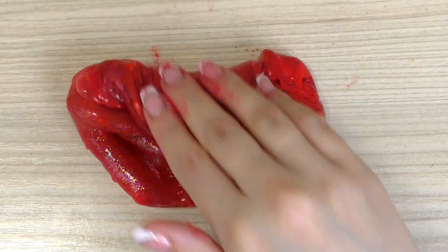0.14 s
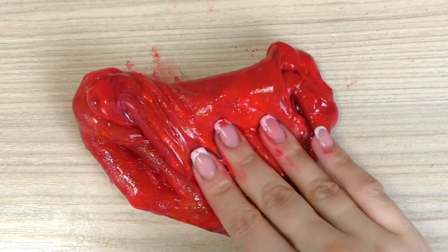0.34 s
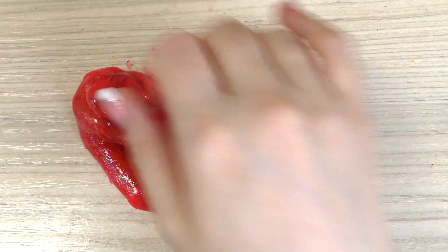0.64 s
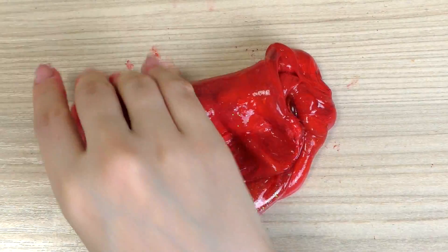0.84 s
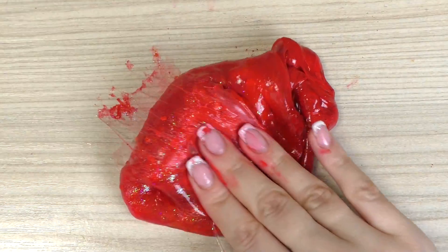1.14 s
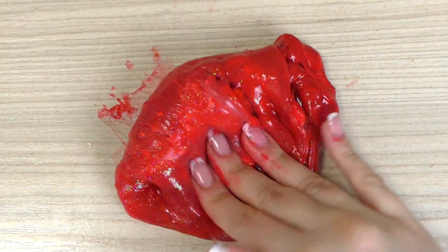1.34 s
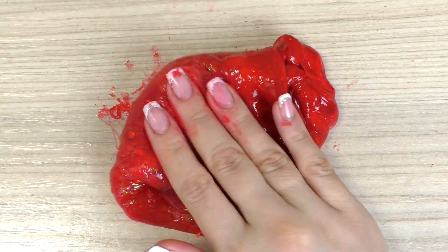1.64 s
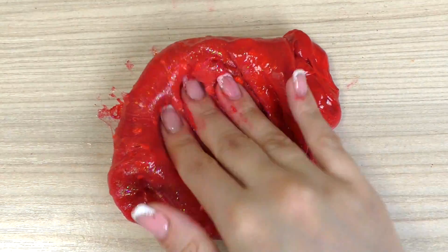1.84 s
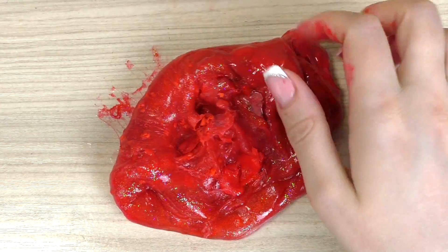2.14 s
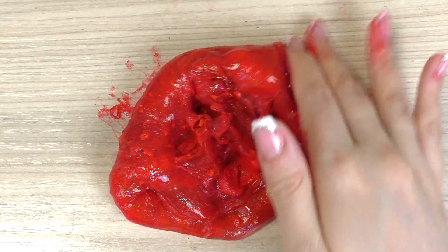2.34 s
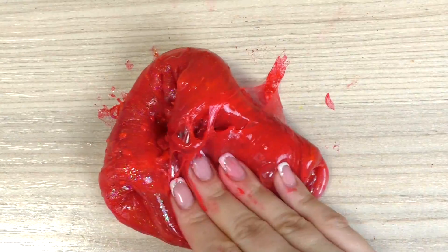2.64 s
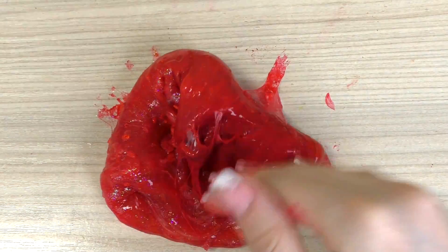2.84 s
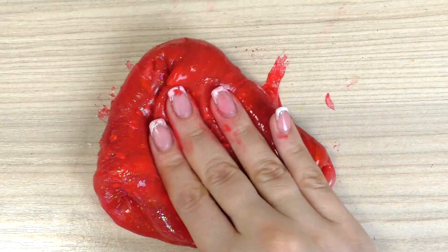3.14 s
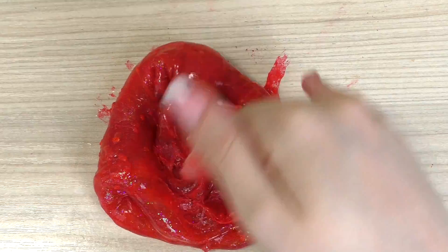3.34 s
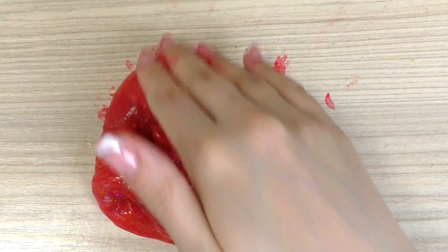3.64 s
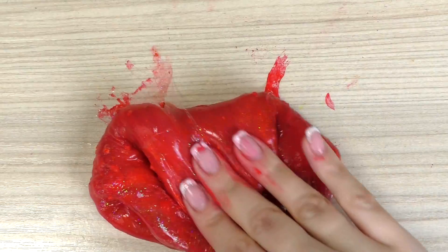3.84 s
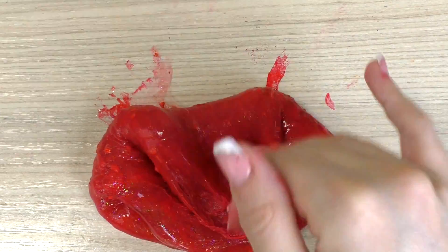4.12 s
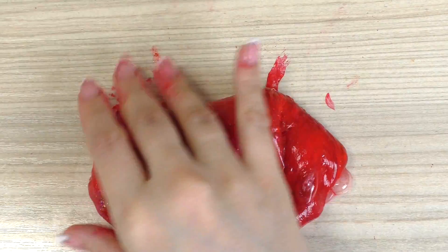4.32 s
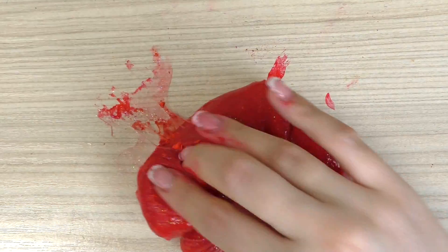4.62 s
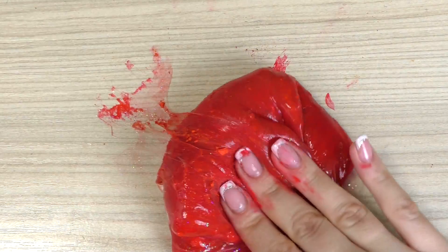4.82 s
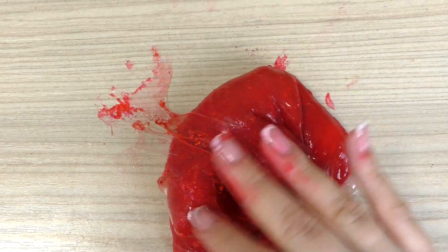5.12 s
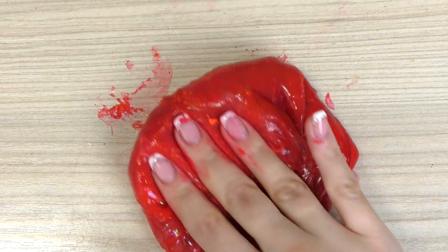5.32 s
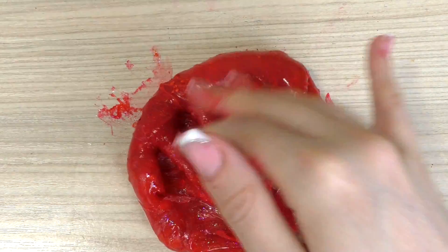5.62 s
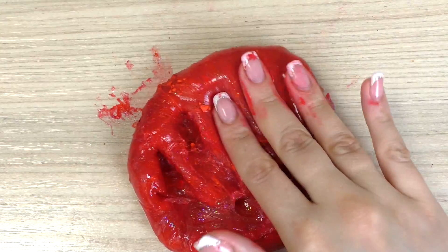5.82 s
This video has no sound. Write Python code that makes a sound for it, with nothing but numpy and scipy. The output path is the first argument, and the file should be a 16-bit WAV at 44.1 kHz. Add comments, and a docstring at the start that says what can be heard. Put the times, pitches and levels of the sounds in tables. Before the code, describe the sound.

Irregular wet clicks and little pops come from slime being kneaded by hand on a wooden tabletop. A round plop and a sharp snap stand out early, then smaller pops keep coming, singly and in quick clusters, with fine sticky crackling and a few dull, soft presses. The sound is close and centred, in a small room with faint hiss and a low hum.

```python
"""Kneading slime

A hand presses and folds sticky slime on a wooden table, close by in a small room. Trapped air pockets
burst with wet clicks and plops, the skin crackles as it peels off fingers and table, and presses thud
softly. A faint low hum and hiss lie underneath."""
import sys
import numpy as np
from scipy import signal
from scipy.io import wavfile
from scipy.ndimage import uniform_filter1d

SR = 44100
rng = np.random.default_rng(int(sys.argv[2]) if len(sys.argv) > 2 else 0)


def persist_wave(psi):
    """Save psi, clipped to +-1, as 16-bit WAV."""
    counts = np.round(np.clip(psi, -1, 1) * 32767).astype(np.int16)
    wavfile.write(sys.argv[1], SR, np.atleast_2d(counts).T)


N = 263277


# Large air pockets: t/s, cavity f/Hz, cavity level/dB, cavity rise/cycles, film f/Hz, film level/dB
POCKETS = [(0.1476, 4470, -25.5, 0.95, 7400, -26), (0.149, 6100, -26.5, 1.2, 9000, -20.5),
           (0.2596, 1570, -31.5, 0.29, 4100, -46), (0.3858, 1400, -28, 4.1, 11490, -50),
           (0.4396, 1480, -23.5, 1.3, 8900, -42), (0.4467, 1613, -9, 1.68, 2790, -19.5),
           (0.4559, 1560, -26, 1.2, 2970, -50), (0.9568, 4060, -38, 0.15, 12950, -27),
           (1.0082, 7500, -50, 0.54, 9400, -24.5), (1.0571, 6200, -40, 0.27, 8900, -23.5),
           (1.0605, 5700, -24.5, 0.45, 8030, -22.5), (1.1732, 3200, -22, 0.28, 8900, -22),
           (1.3, 3240, -28, 0.19, 6980, -42), (1.3253, 6000, -1, 0.42, 14700, -6),
           (1.6088, 3540, -55, 0.17, 12600, -38.5), (2.021, 6800, -31, 0.6, 11900, -31.5),
           (2.0598, 4060, -28, 1.5, 12300, -41), (2.0655, 3820, -25.5, 0.89, 12800, -33),
           (2.3531, 3560, -28, 0.12, 12100, -32.5), (2.356, 3080, -15.5, 0.23, 3800, -30.5),
           (2.446, 4650, -53, 0.25, 11000, -33.5), (2.6682, 9700, -29.5, 2.9, 2380, -45),
           (2.7462, 1630, -25.5, 0.31, 10400, -12.5), (2.887, 1500, -50, 0.18, 12200, -33),
           (3.155, 6420, -6.5, 0.55, 4570, -25.5), (3.3991, 2040, -24, 0.067, 11000, -12),
           (3.401, 1210, -43, 2.8, 11000, -39), (3.8056, 1600, -46, 0.4, 9600, -30.5),
           (4.1648, 1100, -48.5, 2.0, 10100, -25.5), (4.47, 2160, -30, 1, 3130, -29.5),
           (4.5931, 3500, -53, 0.2, 9400, -33), (4.918, 2700, -30.5, 0.25, 11300, -30),
           (5.1096, 4610, -20.5, 0.49, 9300, -23), (5.4592, 3980, -51, 0.39, 12300, -21),
           (5.4614, 2380, -50, 0.23, 12800, -29), (5.645, 2000, -57, 0.65, 13500, -22),
           (5.66, 4340, -34, 1.5, 10200, -18), (5.6633, 4440, -23, 1.33, 9100, -41),
           (5.863, 5000, -47, 0.21, 12700, -26.5)]

def pops(film_rise_cycles=0.7, slow_rise_s=0.0005):
    """A pocket bursts: the film snaps, the cavity rings. Slow cavities ring cleanly, without the rips."""
    out = np.zeros(N)
    for start_s, cavity_hz, cavity_db, rise_cycles, film_hz, film_db in POCKETS:
        rupture = tear(max(cavity_db, film_db))
        cavity = ping(cavity_hz, rise_cycles, roundness=1.4)
        if rise_cycles / cavity_hz <= slow_rise_s:
            cavity = np.convolve(cavity, rupture)
        film = np.convolve(ping(film_hz, film_rise_cycles), rupture)
        add(out, start_s, from_db(cavity_db) * cavity)
        add(out, start_s, from_db(film_db) * film)
    return out


def tear(pocket_db, raggedness=0.32, onset_s=0.0013, fade_s=0.0051):
    """One rupture, then small rips as the hole widens. Weaker pockets open more raggedly."""
    t = np.arange(SR // 50) / SR
    rips = rng.standard_normal(len(t)) * (1 - np.exp(-t / onset_s)) * np.exp(-t / fade_s)
    rip_gain = from_db(-13.5 - raggedness * pocket_db)
    impulse = t == 0
    return (impulse + rip_gain * rips / np.linalg.norm(rips)) / np.hypot(1, rip_gain)


# Sticky contacts peeling: peak t/s, length/s, level/dB, treble tilt/dB
PEELS = [(0.064, 0.078, -74, -9.5), (0.134, 0.049, -60, -3), (0.287, 0.14, -65, 3), (0.39, 0.08, -62, -6.5),
         (0.609, 0.07, -55, -2.5), (1.001, 0.069, -55.5, 3), (1.165, 0.12, -63, -5.5),
         (1.26, 0.08, -62.5, -5), (1.511, 0.083, -58, 1), (1.79, 0.16, -76, -14.5),
         (2.047, 0.098, -55.5, -0.5), (2.381, 0.066, -56.5, -5.5), (2.539, 0.12, -56.5, 0.5),
         (2.73, 0.39, -64.5, -2), (2.917, 0.055, -49, 1), (3.412, 0.065, -51, 1), (3.815, 0.153, -64, 3.5),
         (3.991, 0.13, -68.5, -7.5), (4.171, 0.055, -59, 1), (4.486, 0.061, -61.5, -10),
         (4.614, 0.098, -60, 3.5), (4.69, 0.14, -67, 6.5), (4.813, 0.05, -60.5, -3),
         (4.944, 0.22, -66.5, -5), (5.114, 0.055, -46.5, 1), (5.607, 0.055, -64.5, 0),
         (5.673, 0.07, -51, 2.5)]

def peeling(rise_share=0.48, mid_db=-2):
    """Each peel swells and fades. Returns the power of the low, mid and high bubbles over time."""
    t = np.arange(N) / SR
    power = np.zeros((3, N))
    for peak_s, length_s, level_db, tilt_db in PEELS:
        near = np.abs(t - peak_s) < 2 * length_s
        offset_s = t[near] - peak_s
        width_s = length_s * np.where(offset_s < 0, rise_share, 1 - rise_share)
        gains = from_db(level_db + np.array([-tilt_db, mid_db, tilt_db]))
        power[:, near] += gains[:, None] ** 2 * np.exp(-2 * (offset_s / width_s) ** 2)
    return power


# Tiny bubbles, low to high: min f/Hz, max f/Hz, rate/(1/s), rise/cycles, level between peels/dB
BUBBLES = [(1076, 3000, 800, 1.11, -76), (3225, 6780, 1300, 1.5, -90.5), (9200, 13500, 550, 1.3, -84)]

def squelches(tick_db=-62, tick_follow=0.87):
    """Peeling skin crackles over a steady trace. Stray ticks of pinhead pockets follow the top band."""
    out = np.zeros(N)
    for (low_hz, high_hz, rate_per_s, rise_cycles, rest_db), power in zip(BUBBLES, peeling()):
        envelope = np.sqrt(power + from_db(rest_db) ** 2)
        out += envelope * crackle(low_hz, high_hz, rate_per_s, rise_cycles)
    ticks = crackle(low_hz=7500, high_hz=15000, rate_per_s=70, rise_cycles=0.6)
    return out + from_db(tick_db) * unit_rms(envelope ** tick_follow) * ticks


def crackle(low_hz, high_hz, rate_per_s, rise_cycles, spread_db=3.5, pitches=7):
    """Tiny bubbles of uneven size and pitch burst at random; rms 1."""
    out = np.zeros(N)
    for hz in np.geomspace(low_hz, high_hz, pitches):
        sizes = from_db(spread_db * np.minimum(rng.exponential(1, N), 4))
        signs = rng.choice([-1, 1], N)
        bursts = rng.random(N) < rate_per_s / pitches / SR
        bubble = ping(hz, rise_cycles)
        out += signal.oaconvolve(sizes * signs * bursts, bubble / np.linalg.norm(bubble))[:N]
    return unit_rms(out)


# Presses and large pockets: t/s, f/Hz, level/dB, rise/cycles
THUDS = [(0.445, 407, -46.5, 1.1), (1.268, 366, -59, 1.5), (1.325, 394, -52.5, 0.7),
         (1.789, 306, -60.5, 1.6), (2.357, 107.8, -57, 0.85), (2.355, 347, -59, 0.94),
         (3.411, 438, -54, 1.2), (3.429, 115, -56.5, 0.54), (4.186, 109.3, -59.5, 0.61),
         (5.111, 380, -61.5, 1.6), (5.145, 100, -53.5, 0.75), (5.667, 400, -53, 3.6)]

def thuds(squish_db=-13, squish_rise_s=0.0092):
    """Soft low knocks, damped by the slime, each with a dull squish around its pitch."""
    out = np.zeros(N)
    age = np.arange(SR // 8) / SR / squish_rise_s
    for start_s, hz, level_db, rise_cycles in THUDS:
        squish = rng.standard_normal(len(age))
        for _ in range(2):
            squish = resonance(squish, hz, width_hz=1.4 * hz)
        add(out, start_s, from_db(level_db) * ping(hz, rise_cycles))
        add(out, start_s, from_db(level_db + squish_db) * unit_rms(squish) * age * np.exp(1 - age))
    return out


# Table top resonances: f/Hz, width/Hz, level/dB
WOOD_MODES = [(1136, 50, 7), (1590, 43, -9), (2380, 38, -6.5)]

def table_top(x, highpass_hz=1050, body_db=-17):
    """Small pockets radiate little bass; the wood rings along and adds a faint low body."""
    body = from_db(body_db) * resonance(x, hz=390, width_hz=500)
    direct = signal.sosfilt(signal.butter(4, highpass_hz, "high", fs=SR, output="sos"), x)
    ring = sum(from_db(db) * resonance(direct, hz, width_hz) for hz, width_hz, db in WOOD_MODES)
    return direct + body + ring


# Room response: f/Hz, early level/dB, tail level/dB, T60/s
REVERB = [(400, -13.5, -3, 0.23), (1500, -9, -10, 0.44), (3300, -0.5, -8, 0.42), (4670, -7.5, -6, 0.24),
          (7300, 0.5, -6, 0.32), (8760, -5.5, -7.5, 0.27), (11000, 0, -7.5, 0.22), (14600, -5, -7.5, 0.16)]
# Stereo image of the reflections: f/Hz, left-right correlation
REVERB_CORRELATION = [(300, 0.57), (1500, 0.35), (6500, 1), (15000, 0.64)]

def room(x, gap_s=0.00076, early_decay_s=0.0064, tail_rise_s=0.0078):
    """Quick reflections from hand and table, then a short diffuse tail."""
    t = np.arange(SR // 2) / SR
    age_s = np.maximum(t - gap_s, 0)
    early = np.exp(-age_s / early_decay_s) * (age_s > 0)
    response = 0
    for hz, band in noise_bands(REVERB_CORRELATION, samples=2 * len(t), count=27, lowest_hz=100):
        early_db, tail_db, t60_s = (at_hz(REVERB, hz, column) for column in (1, 2, 3))
        tail = (1 - np.exp(-age_s / tail_rise_s)) * from_db(-60 * age_s / t60_s)
        early_gain = from_db(early_db) / np.linalg.norm(early)
        tail_gain = from_db(tail_db) / np.linalg.norm(tail)
        response += band[:, len(t):] * np.hypot(early_gain * early, tail_gain * tail)
    return signal.fftconvolve(x[None], response, axes=1)[:, :N]


# Room noise spectrum: f/Hz, relative density/dB
AIR_SPECTRUM = [(25, -12), (50, -15), (110, -5), (180, -8.5), (370, -11.5), (580, -24), (1000, -17),
                (2000, -18.5), (3000, -23), (4500, -30), (6800, -48), (10000, -33), (16000, -28)]
# Stereo image of the room noise: f/Hz, left-right correlation
AIR_CORRELATION = [(30, 0.31), (130, 0.47), (300, 0.65), (640, 0.45), (1400, 0.31), (3200, 0.15),
                   (6500, .4), (15000, 0.37)]

def air(level_db=-63):
    """Steady room noise and hiss."""
    bands = noise_bands(AIR_CORRELATION, samples=N, count=20, lowest_hz=20)
    noise = sum(from_db(at_hz(AIR_SPECTRUM, hz)) * band for hz, band in bands)
    return from_db(level_db) * unit_rms(noise)


def hum(hz=155, wander_hz=5.54, level_db=-71.5, waver_db=7):
    """A faint low tone that wavers in level and slightly in pitch."""
    phase = 2 * np.pi * np.cumsum(hz + wander_hz * drift(window_samples=2500)) / SR
    gain = from_db(level_db + waver_db * drift(window_samples=4000))
    return gain * np.sqrt(2) * np.sin(phase)


def ping(hz, rise_cycles, roundness=0.77):
    """Heavily damped tone; its envelope peaks after rise_cycles. Roundness softens the start."""
    rise_s = rise_cycles / hz
    t = np.arange(int(10 * rise_s * SR) + 8) / SR
    age = t / rise_s
    return (age * np.exp(1 - age)) ** roundness * np.sin(2 * np.pi * hz * t)


def resonance(x, hz, width_hz):
    """Two-pole band-pass, peak gain 1."""
    radius = np.exp(-np.pi * width_hz / SR)
    feedforward = np.array([1, 0, -1]) * (1 - radius ** 2) / 2
    feedback = [1, -2 * radius * np.cos(2 * np.pi * hz / SR), radius ** 2]
    return signal.lfilter(feedforward, feedback, x)


def noise_bands(correlation, samples, count, lowest_hz):
    """Yield (centre f/Hz, band) of partly correlated stereo noise."""
    edges_hz = np.geomspace(lowest_hz, 17000, count + 1)
    white = rng.standard_normal((2, 2, samples))
    for k, (low_hz, high_hz) in enumerate(zip(edges_hz, edges_hz[1:])):
        bandpass = signal.butter(2, [low_hz, high_hz], "band", fs=SR, output="sos")
        mid, side = signal.sosfilt(bandpass, white[k % 2])
        hz = np.sqrt(low_hz * high_hz)
        alike = at_hz(correlation, hz)
        yield hz, np.sqrt((1 + alike) / 2) * mid + np.sqrt((1 - alike) / 2) * side * [[1], [-1]]


def drift(window_samples):
    """Slow random motion; rms 1."""
    return unit_rms(uniform_filter1d(rng.standard_normal(N), size=window_samples, mode="wrap"))


def at_hz(table, hz, column=1):
    """Interpolate a column over log frequency."""
    table = np.array(table)
    return np.interp(np.log(hz), np.log(table[:, 0]), table[:, column])


def add(track, start_s, sound):
    start = round(start_s * SR)
    track[start:start + len(sound)] += sound[:N - start]


def from_db(db):
    return 10 ** (np.asarray(db) / 20)


def unit_rms(x):
    return x / np.sqrt(np.mean(x ** 2) + 1e-20)


def scene(pop_gain_db=-2.3, squelch_gain_db=-6, thud_gain_db=5, pan_db=0.2):
    """Slime on the table, almost straight ahead, over room noise and hum."""
    bursts = from_db(pop_gain_db) * pops() + from_db(squelch_gain_db) * squelches()
    slime = table_top(bursts) + from_db(thud_gain_db) * thuds()
    pan = from_db([[pan_db], [-pan_db]])
    return (slime + room(slime)) * pan + air() + hum()


def record(dry, cutoff_hz=15750):
    """Steep low-pass."""
    return signal.sosfilt(signal.ellip(10, 0.1, 70, cutoff_hz, fs=SR, output="sos"), dry)


dry = scene()
out = record(dry)
persist_wave(out)
```